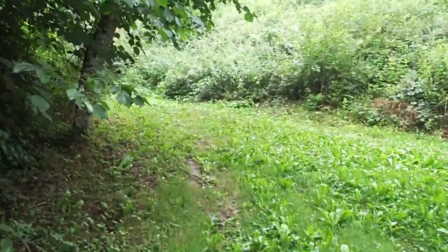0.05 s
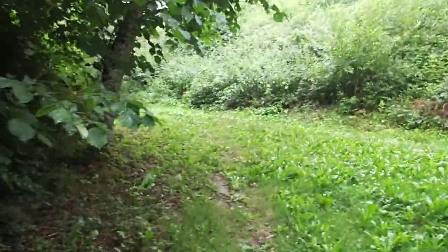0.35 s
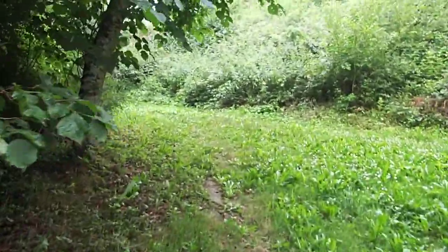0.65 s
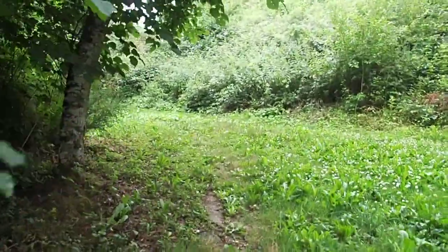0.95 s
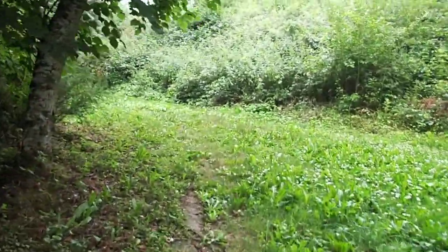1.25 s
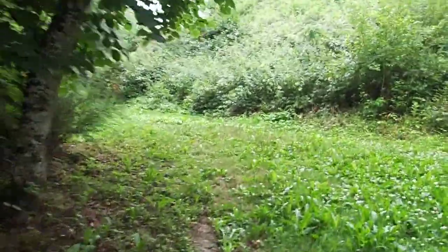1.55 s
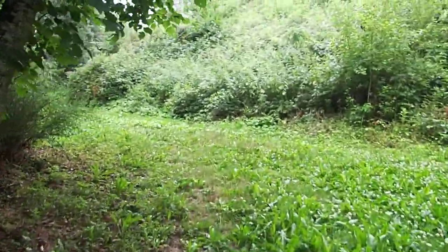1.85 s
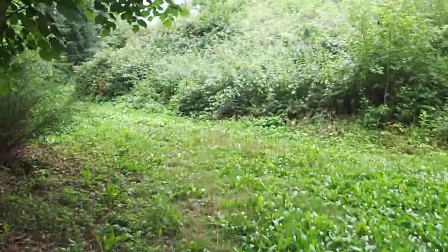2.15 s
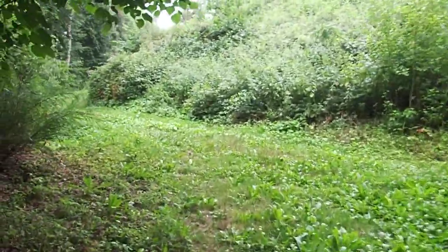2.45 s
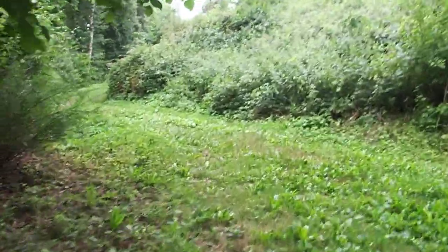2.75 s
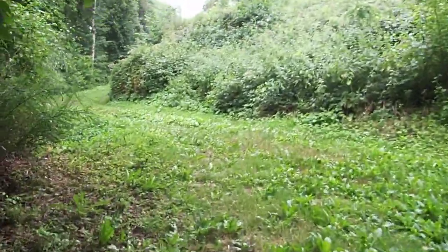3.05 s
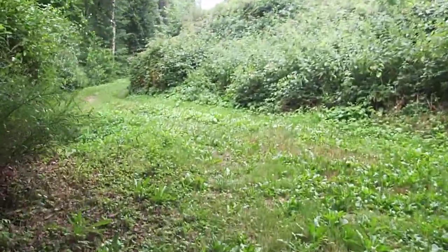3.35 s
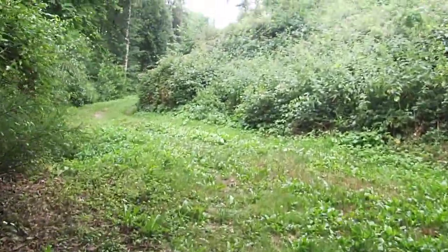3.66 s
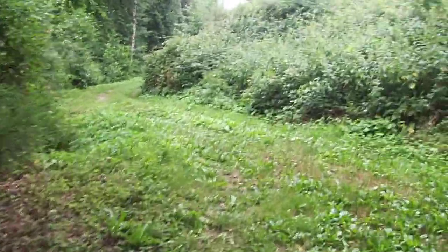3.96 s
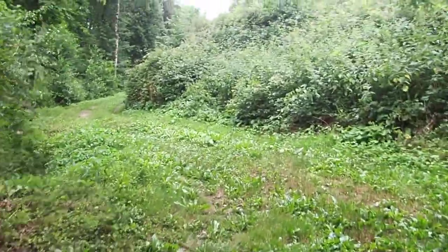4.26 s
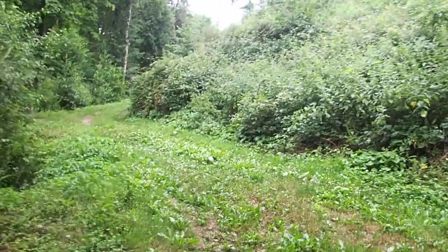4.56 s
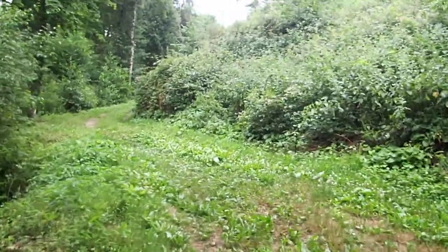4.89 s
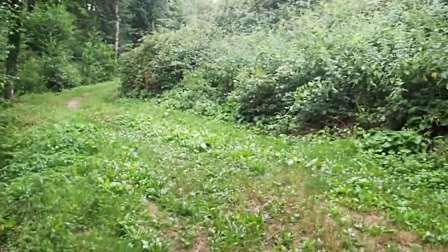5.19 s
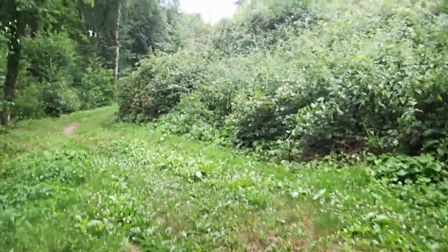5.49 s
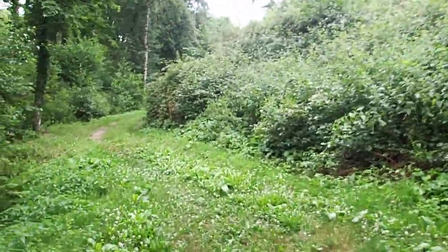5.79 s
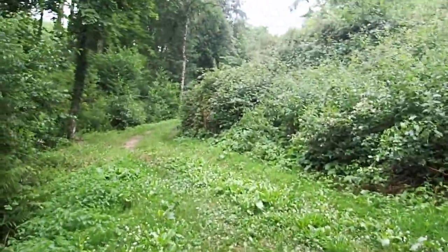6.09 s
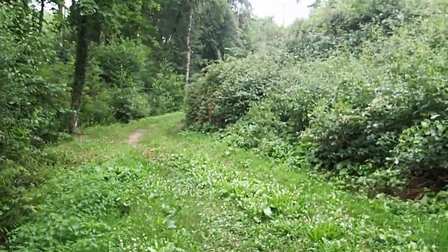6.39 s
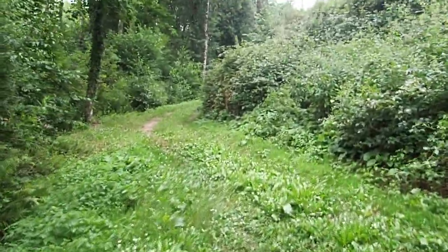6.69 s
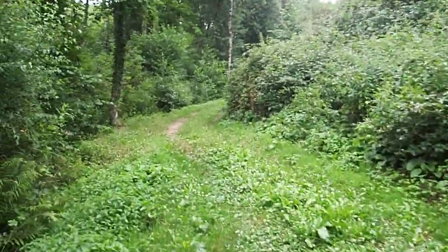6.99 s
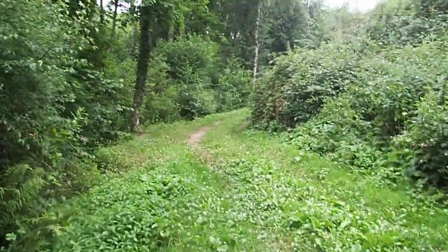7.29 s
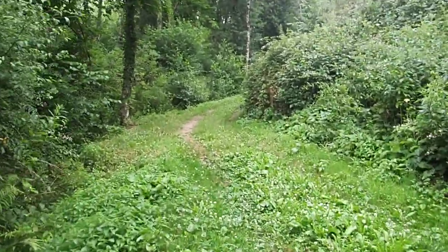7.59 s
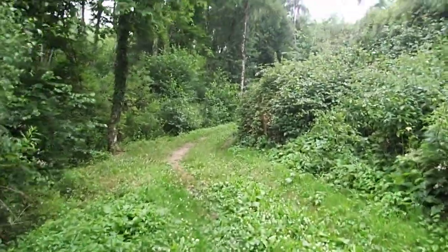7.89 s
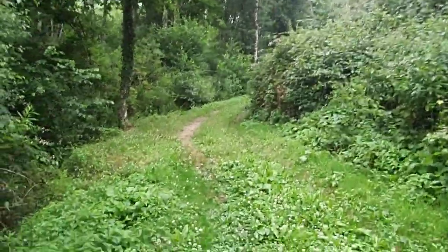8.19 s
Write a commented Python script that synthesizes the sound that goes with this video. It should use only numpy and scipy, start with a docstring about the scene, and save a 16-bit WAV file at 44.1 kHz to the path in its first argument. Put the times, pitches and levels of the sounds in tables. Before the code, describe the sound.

Rain hisses and taps on foliage during a slow walk, broken by two loud handling clicks, with faint birds far off.

```python
"""Steady rain on garden bushes and grass, heard by a small hand-held camera carried slowly along a path.
Far drops merge into hiss; near ones tap damped leaves. Soft steps thud, brushed leaves snap and rustle,
the lens motor fizzes now and then and a few birds whistle far off. Two sharp clicks on the camera
overload it and its limiter ducks the rain. The microphone ports ring near 5 kHz."""
import sys
import numpy as np
from scipy import signal
from scipy.fft import rfft, irfft
from scipy.io import wavfile
from scipy.ndimage import uniform_filter1d, minimum_filter1d

SR = 44100
rng = np.random.default_rng(int(sys.argv[2]) if len(sys.argv) > 2 else 0)


def store_pcm(level_fs):
    """Save levels as 16-bit WAV."""
    pcm = np.round(np.clip(level_fs, -1, 1) * 32767).astype(np.int16)
    wavfile.write(sys.argv[1], SR, np.atleast_2d(pcm).T)


N = 367773


def amp(db):
    """dB to gain."""
    return 10 ** (np.asarray(db) / 20)


def unit_rms(x):
    """Scale to rms 1."""
    return x / np.sqrt(np.mean(x ** 2) + 1e-20)


def drift(samples):
    """Smooth random wander, rms 1."""
    return unit_rms(uniform_filter1d(rng.standard_normal(N), size=samples))


def per_bin(curve):
    """Interpolate (f/Hz, value) rows onto the FFT bins, along log f."""
    hz, value = np.transpose(curve)
    return np.interp(np.log(np.fft.rfftfreq(N, 1 / SR) + 1), np.log(hz + 1), value)


def add(mix, start_s, sound):
    """Mix a sound in at start_s."""
    part = mix[:, round(start_s * SR):][:, :sound.shape[-1]]
    part += sound[..., :part.shape[1]]


def pan(db):
    """Gain pair, left over right by db."""
    return amp([[db / 2], [-db / 2]])


def contact_t60_s(db, levels_db, t60s_s):
    """Decay time: shrinks by equal ratios as the contact gets harder."""
    return np.exp(np.interp(db, levels_db, np.log(t60s_s)))


def diffuse_noise(spectrum):
    """Noise at the two ports, rms 1: alike in the bass, less so in the treble."""
    # left-right coherence: f/Hz, coherence/0-1
    coherence = [(60, 0.9), (110, 0.88), (200, 0.93), (380, 0.83), (700, 0.88), (1290, 0.96), (2380, 0.99),
                 (4400, 0.71), (8120, 0.41), (15000, 0.07)]
    alike = per_bin(coherence)
    left, independent = rfft(rng.standard_normal((2, N)))
    right = alike * left + np.sqrt(1 - alike ** 2) * independent
    return unit_rms(irfft(np.array([left, right]) * amp(per_bin(spectrum)), N))


def tap(hz, t60_s, pan_db=0):
    """Struck, heavily damped surface: a few dying cycles."""
    t = np.arange(SR // 25) / SR
    return pan(pan_db) * amp(-60 * t / t60_s) * np.sin(2 * np.pi * hz * t)


def snap(hz, t60_cycles, contact_db, pan_db=0):
    """Sharp tap: the contact cracks, then the surface rings."""
    sound = tap(hz, t60_cycles / hz, pan_db)
    sound[:, :2] += pan(pan_db) * amp(contact_db) * np.array([1, -1])
    return sound


def rain_wash(level_db=-34.5, patch_db=1.13, flicker_db=0.5):
    """Countless far drops merge into a hiss that shifts in patches as they land in clumps."""
    # rain on distant foliage: f/Hz, relative density/dB
    spectrum = [(25, -23), (60, -3), (130, 1.5), (300, 2.5), (550, -2.5), (1100, -3.5), (1700, -8),
                (3000, -16), (6500, -21), (9500, -26), (15600, -25.5)]
    cells = signal.stft(diffuse_noise(spectrum), nperseg=512, noverlap=384)[2]
    patches = uniform_filter1d(rng.standard_normal(cells.shape[1:]), size=8, axis=0)
    patches = unit_rms(uniform_filter1d(patches, size=12, axis=1))
    flicker = unit_rms(uniform_filter1d(rng.standard_normal(cells.shape[-1]), size=6))
    cells *= amp(patch_db * patches + flicker_db * flicker)
    hiss = signal.istft(cells, nperseg=512, noverlap=384)[1][:, :N]
    return amp(level_db) * unit_rms(hiss)


def rain_patter(level_db=-43, drops_per_s=500, leaves=32, spread_db=5, t60_cycles=7):
    """Drops on nearer leaves: each leaf has its own pitch and place; small leaves are fainter."""
    out = np.zeros((2, N))
    per_leaf = int(drops_per_s * N / SR / leaves)
    for hz in np.geomspace(500, 11000, leaves):
        when, chance = rng.random((per_leaf, 2)).T
        size = np.minimum(-np.log(1 - chance), 4)  # large drops are rare
        hits = np.zeros(N)
        hits[(when * N).astype(int)] = amp(spread_db * size)
        leaf = tap(hz, t60_cycles / hz, pan_db=rng.normal(0, 4.9)) / hz ** 0.51
        out += signal.oaconvolve(hits[None], leaf, axes=1)[:, :N]
    return amp(level_db) * unit_rms(out)


def rain_strength(lull_s=4.5, width_s=2.4, lull_db=-1.33, swell_db=0.67, swell_s=0.35):
    """Gain: the rain eases to one lull and picks up again, with small random swells."""
    lull = np.exp(-((np.arange(N) / SR - lull_s) / width_s) ** 2)
    return amp(lull_db * lull + swell_db * drift(int(swell_s * SR)))


def thuds(rise_s=0.0016, band_ratio=1.47, knock_db=4, t60_cycles=4, side_gain=0.21):
    """Footfalls and hand bumps: a dull knock, then a noise puff in the same broad resonance."""
    # soft contacts: t/s, level/dB, f/Hz
    bumps = [(.44, -27.5, 225), (1.552, -26.5, 200), (2.124, -17, 201), (2.4, -20.5, 200), (2.63, -29, 320),
             (3.052, -30, 160), (3.109, -26, 139), (3.713, -21, 570), (3.889, -23, 260), (4.113, -27, 645),
             (4.999, -32, 280), (5.283, -27.5, 820), (5.702, -36, 229), (7.014, -29, 840),
             (7.226, -29, 274), (7.934, -28.5, 250), (7.939, -24.5, 1180), (8.136, -30, 900)]
    out = np.zeros((2, N))
    t = np.arange(SR // 2) / SR
    for start_s, db, hz in bumps:
        t60_s = contact_t60_s(db, levels_db=[-30, -23.5], t60s_s=[0.22, 0.05])
        body = signal.butter(2, [hz / band_ratio, hz * band_ratio], "bandpass", fs=SR, output="sos")
        mid, side = signal.sosfilt(body, rng.standard_normal((2, len(t))))
        puff = unit_rms(np.array([mid + side_gain * side, mid - side_gain * side]))
        envelope = amp(db - 60 * t / t60_s) * (1 - np.exp(-t / rise_s))
        add(out, start_s, envelope * puff)
        add(out, start_s, amp(db + knock_db) * tap(hz, t60_cycles / hz))
    return out


def rustles(grain_db=4, rise_s=0.00044):
    """Wet leaves slide over each other in grainy bursts; gentler brushes last longer."""
    # leaves brushed in passing: t/s, level/dB
    brushes = [(0.494, -31.5), (1.646, -29), (1.741, -43), (2.596, -33.5), (2.745, -37), (4.056, -28),
               (4.101, -30.5), (6.14, -38), (8.1361, -23)]
    # leaf friction: f/Hz, relative density/dB
    spectrum = [(200, -8), (700, 8), (2000, -2.5), (4000, -5.5), (6500, -11), (10000, -12.5), (16000, -22)]
    envelope = np.zeros(N)
    for start_s, db in brushes:
        t60_s = contact_t60_s(db, levels_db=[-39.5, -23.5], t60s_s=[0.47, 0.065])
        age_s = np.maximum(np.arange(N) / SR - start_s, 0)
        envelope += (1 - np.exp(-age_s / rise_s)) * amp(db - 60 * np.minimum(age_s / t60_s, 2))
    grain = unit_rms(amp(grain_db * drift(samples=70)))
    return diffuse_noise(spectrum) * grain * envelope


def near_ticks():
    """Sharp ticks close by: large drops on leaves, and twig or leaf snaps that start a rustle."""
    # drops and snaps: t/s, level/dB, f/Hz
    ticks = [(.4967, -15.5, 4320), (.838, -17.5, 2540), (1.3068, -12.5, 4000), (1.556, -15.5, 3350),
             (2.2712, -16, 5170), (2.3638, -8.5, 4800), (2.4567, -5, 4600), (2.587, -16, 4500),
             (2.85, -22, 5900), (4.058, -23, 4640), (4.1023, -23, 4300), (6.7688, -10, 2670),
             (6.8367, -18, 5700), (7.2923, -7.5, 4630), (8.1353, -19, 3600), (8.307, -19, 4500)]
    out = np.zeros((2, N))
    for start_s, db, hz in ticks:
        add(out, start_s, amp(db) * snap(hz, t60_cycles=5.4, contact_db=-11))
    return out


def lens_motor(ramp_s=0.049, uneven_db=1.5, grain_db=2):
    """Fine, gritty fizz that starts and stops as the lens refocuses."""
    # motor runs: start/s, end/s, level/dB
    runs = [(0.968, 1.39, -44.5), (1.594, 1.872, -45), (2.55, 2.95, -50.5), (3.33, 3.748, -44.5),
            (4.03, 4.34, -49), (5.93, 6.662, -45.5), (6.857, 7.325, -46), (7.517, 7.764, -48.5)]
    # motor fizz: f/Hz, relative density/dB
    spectrum = [(300, -16), (1500, 13), (3000, 5), (6000, 5), (8000, 1.5), (10000, 3), (13500, 4.5),
                (16000, 4.5)]
    t = np.arange(N) / SR
    envelope = np.zeros(N)
    for start_s, end_s, db in runs:
        inside_s = np.minimum(t - start_s, end_s - t)
        envelope += amp(db) * np.clip(inside_s / ramp_s + 0.5, 0, 1)
    grit = unit_rms(amp(uneven_db * drift(samples=2500) + grain_db * drift(samples=60)))
    return diffuse_noise(spectrum) * envelope * grit


def body_clicks(rattle_db=-15, rattle_t60_s=0.0075, rebound_s=0.0005, rebound_db=-8):
    """Hard plastic snaps, knocks the shell and rattles, then springs back and touches once more."""
    # clicks on the camera: t/s, level/dB, snap f/Hz, relative knock/dB, snap left over right/dB
    clicks = [(1.8827, 12.5, 3010, -29, -3), (2.0521, -4.5, 3610, -12, -7), (2.0602, 11, 4640, 9, 1),
              (2.1135, -23, 3500, -7, -2), (2.1375, -24, 8000, -12, 0)]
    out = np.zeros((2, N))
    t = np.arange(SR // 25) / SR
    plastic = signal.butter(1, [700, 11000], "bandpass", fs=SR, output="sos")
    # the shell rocks: pushes the right port, pulls more weakly at the left
    shell = tap(hz=1110, t60_s=0.0025, pan_db=-21) * np.array([[-1], [1]])
    for start_s, db, hz, knock_db, pan_db in clicks:
        crack = snap(hz, t60_cycles=5.5, contact_db=-9, pan_db=pan_db)
        rattle = amp(rattle_db - 60 * t / rattle_t60_s) * rng.standard_normal((2, len(t)))
        click = signal.sosfilt(plastic, crack + rattle) + amp(knock_db) * shell
        add(out, start_s, amp(db) * click)
        add(out, start_s + rebound_s, amp(db + rebound_db) * signal.sosfilt(plastic, crack))
    return out


def birds(waver=0.011, scatter_t60_s=0.085):
    """Thin gliding whistles, blurred on their way through the trees."""
    # far calls: t/s, length/s, start f/Hz, end f/Hz, level/dB
    calls = [(2.97, 0.082, 12300, 13000, -54), (4.378, 0.079, 6600, 6400, -56),
             (4.85, .12, 8650, 8450, -60), (5.76, .025, 4900, 4120, -48), (5.792, 0.032, 4000, 2380, -45),
             (5.942, 0.028, 4300, 2860, -44.5), (6.226, 0.15, 10400, 8500, -57),
             (7.662, .17, 3190, 3460, -46), (8.225, 0.087, 5770, 5640, -53)]
    out = np.zeros((2, N))
    t = np.arange(SR // 10) / SR
    for start_s, length_s, start_hz, end_hz, db in calls:
        n = int(length_s * SR)
        hz = np.linspace(start_hz, end_hz, n) * (1 + waver * drift(samples=120)[:n])
        whistle = np.sin(2 * np.pi * np.cumsum(hz) / SR) * np.sin(np.linspace(0, np.pi, n))
        paths = rng.standard_normal((2, len(t))) * amp(-60 * t / scatter_t60_s)
        paths /= np.linalg.norm(paths[0])
        paths[:, 0] += 1  # direct path, as strong as the scatter
        blurred = signal.fftconvolve(whistle[None], paths, axes=1)[:, :n]
        add(out, start_s, amp(db) * unit_rms(blurred))
    return out


def scene():
    """All sound reaching the camera."""
    rain = (rain_wash() + rain_patter()) * rain_strength()
    return rain + thuds() + rustles() + near_ticks() + lens_motor() + body_clicks() + birds()


def microphone(x):
    """Each port rings at its own pitch; the camera's filters cut notches; one more peak near 8 kHz."""
    # port cavities, left then right: f/Hz, width/Hz, gain/dB
    ports = [(5345, 938, 36), (4606, 912, 34)]
    # motor-noise filter notches and one peak, both channels: f/Hz, width/Hz, gain/dB
    notches_and_peak = [(1872, 222, -12), (2620, 810, -8.5), (3394, 295, -9), (4050, 2070, -15.5),
                        (4825, 203, -50), (7998, 610, 6.5)]
    # sensitivity: left/dB, right/dB
    sensitivity_db = [-16.5, -15.5]
    padded = N + SR
    f = np.fft.rfftfreq(padded, 1 / SR)

    def bell(hz, width_hz, db):
        """Causal peak or notch."""
        detuning, damping = hz ** 2 - f ** 2, 1j * f * width_hz
        return (detuning + damping * amp(db)) / (detuning + damping)

    response = np.array([bell(*port) for port in ports])
    response *= np.prod([bell(*band) for band in notches_and_peak], axis=0)
    return amp(sensitivity_db)[:, None] * irfft(rfft(x, padded) * response, padded)[:, :N]


def limiter(x, ceiling_db=-2, attack_s=0.00036, hold_samples=661, recovery_s=0.14):
    """Peaks over the ceiling pull the gain down fast; it holds briefly, then creeps back."""
    needed_gain = np.minimum(1, amp(ceiling_db) / (abs(x).max(0) + 1e-9))
    held_cut = 1 - minimum_filter1d(needed_gain, size=hold_samples, origin=hold_samples // 2)
    fade = np.exp(-np.arange(N) / SR / recovery_s)
    cut = np.maximum.accumulate(held_cut / fade) * fade
    pole = np.exp(-1 / (attack_s * SR))
    return x * (1 - signal.lfilter([1 - pole], [1, -pole], cut))


def record(dry):
    """Microphone colour, limiter, overload, band limit."""
    clipped = np.clip(limiter(microphone(dry)), -1, 1)
    lowpass = signal.firwin(511, cutoff=15850, window=("kaiser", 9), fs=SR)
    return signal.oaconvolve(clipped, lowpass[None], "same")


dry = scene()
out = record(dry)
store_pcm(out)
```